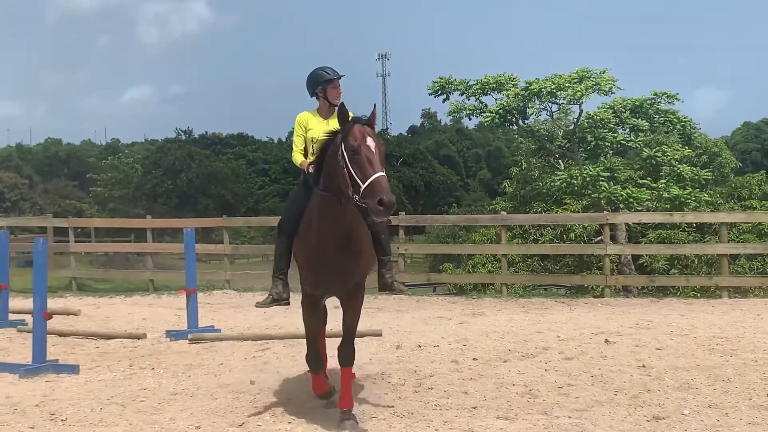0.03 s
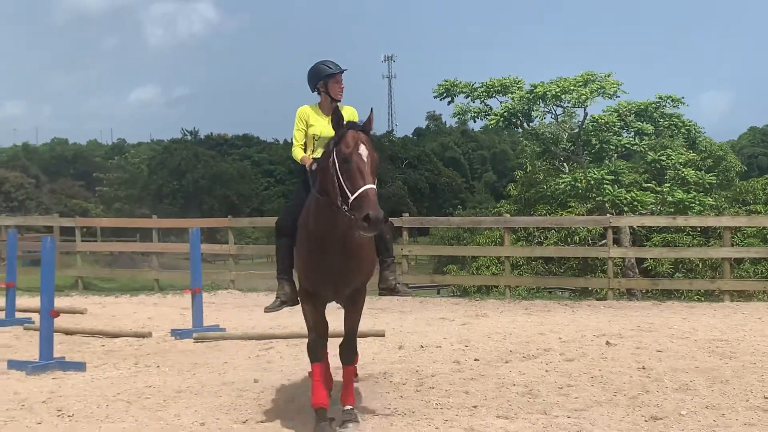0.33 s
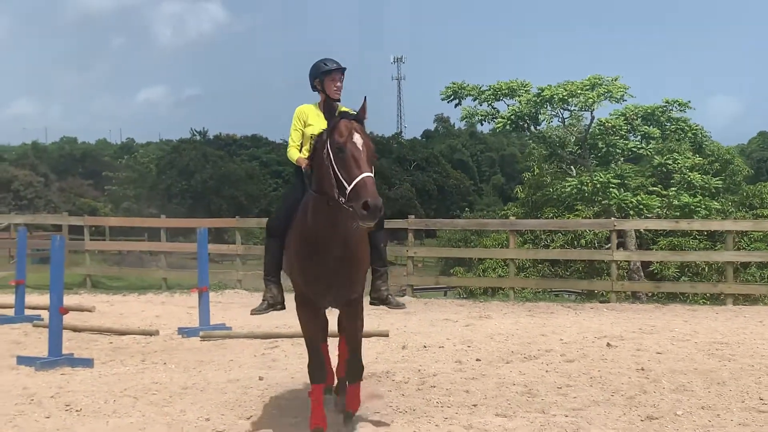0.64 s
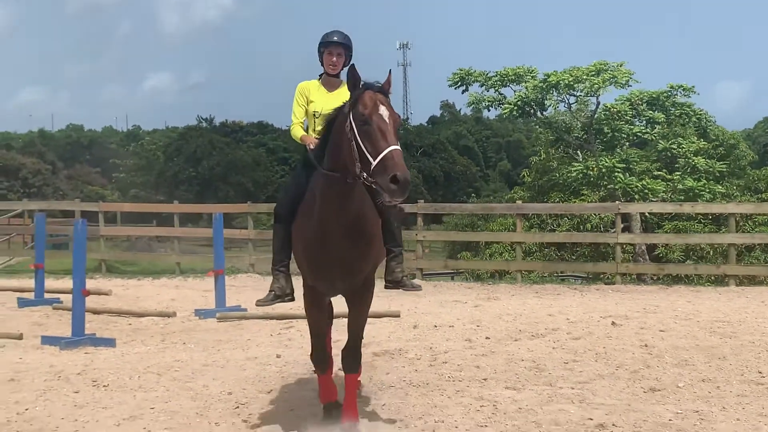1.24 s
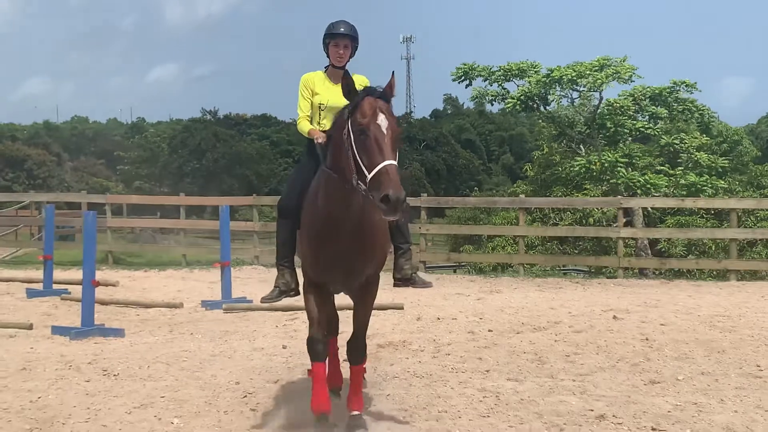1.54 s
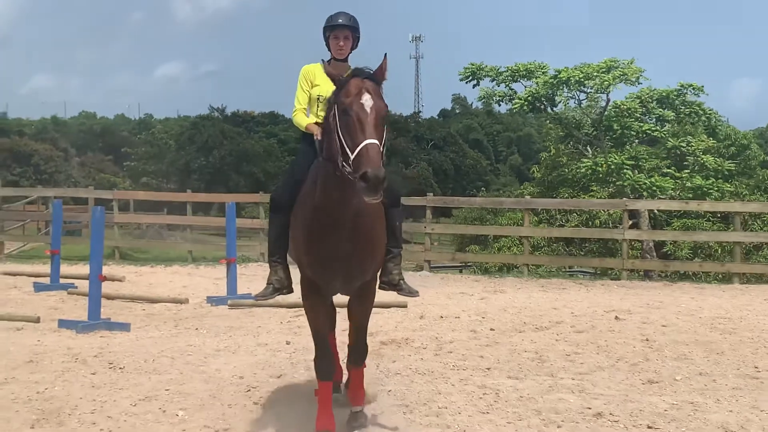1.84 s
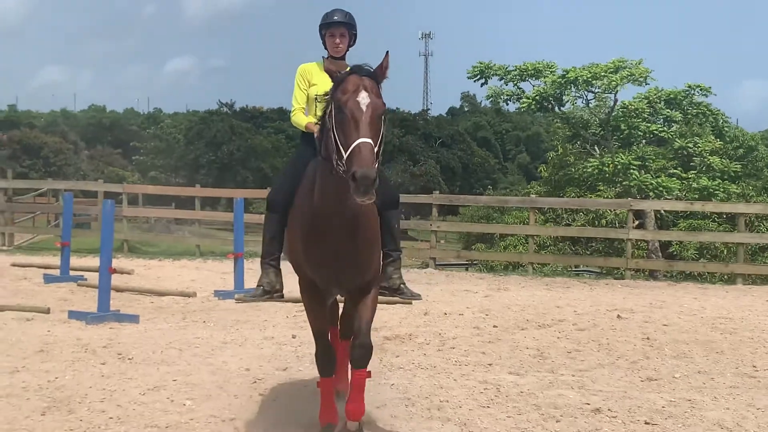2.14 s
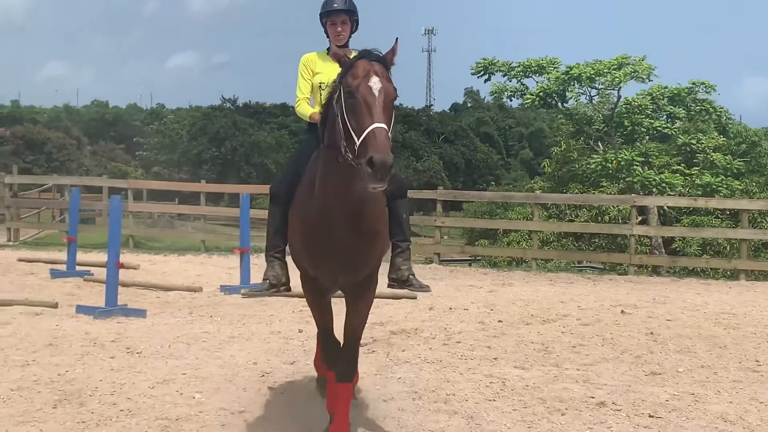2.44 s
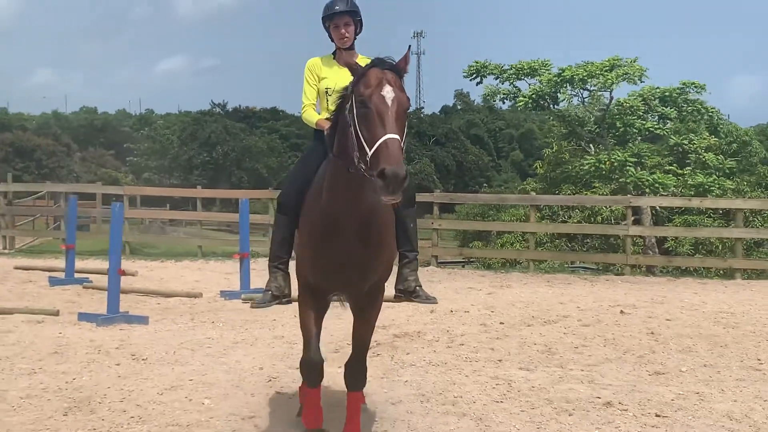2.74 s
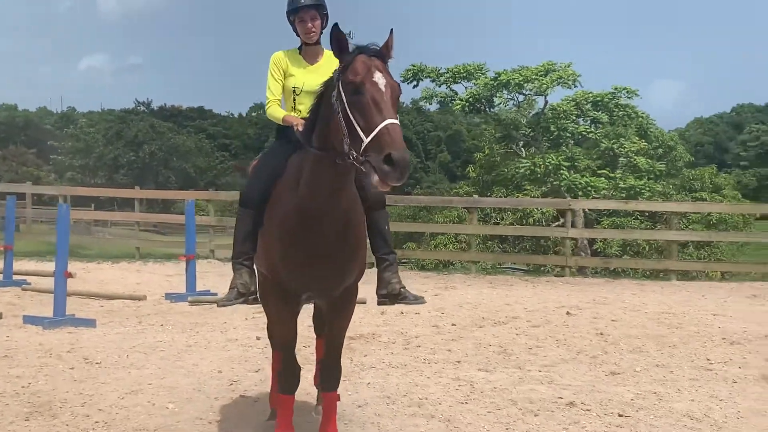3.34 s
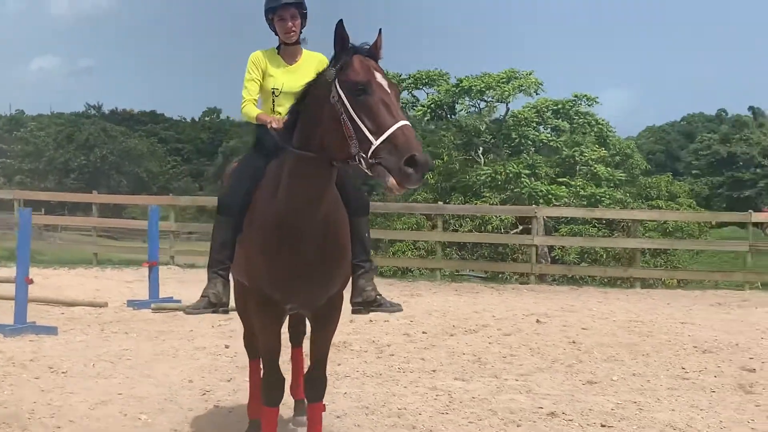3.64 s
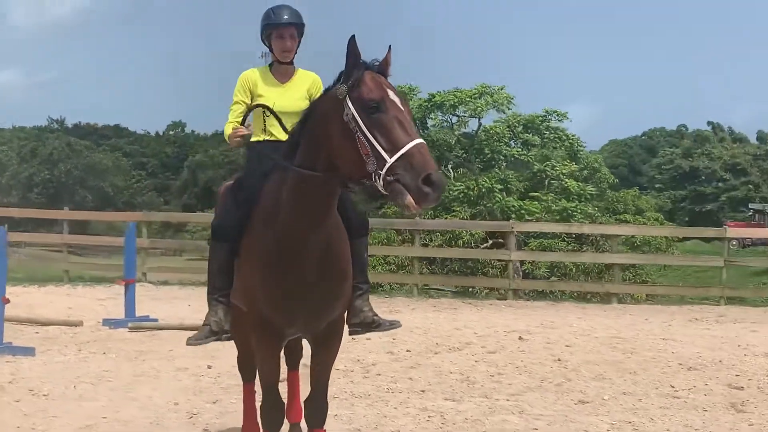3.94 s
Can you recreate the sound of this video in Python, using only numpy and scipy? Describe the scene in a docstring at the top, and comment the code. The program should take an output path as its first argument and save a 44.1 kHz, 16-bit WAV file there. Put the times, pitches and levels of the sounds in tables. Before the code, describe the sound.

A horse whinnies outdoors, trailing into short grunts over low wind rumble.

```python
"""Whinny across an outdoor arena

A horse whinnies: a high, hoarse whistle and a second, lower voice quaver together and sink, ringing
through throat and nose over rasping breath before the call breaks into grunts. Something wooden knocks
once, hooves scuff the sand and tack ticks. An engine idles far off, an insect sings and wind bumps
the microphone."""
import sys
import numpy as np
from scipy import signal
from scipy.fft import rfft, irfft, next_fast_len
from scipy.io import wavfile
from scipy.ndimage import map_coordinates

SR = 44100
rng = np.random.default_rng(int(sys.argv[2]) if len(sys.argv) > 2 else 0)


def waveform_to_disk(signal):
    """Save audio, clipped to [-1, 1], as 16-bit WAV at the path in sys.argv[1]."""
    frames = np.transpose(np.atleast_2d(signal))
    scaled = np.clip(frames, -1, 1) * 32767
    samples = np.round(scaled).astype(np.int16)
    wavfile.write(sys.argv[1], SR, samples)


N = 176400

# Tone of the open-air bed. Each row: frequency in Hz, gain in dB.
AIR_EQ = [(100, -9.5), (300, -2.5), (600, -7.5), (950, -3), (1400, -9.5), (2500, -21), (3700, -19),
          (6300, -18), (7600, -31), (10500, -34), (13000, -46)]
# Width of that bed. Each row: frequency in Hz, left-right correlation (1 is mono).
AIR_CORRELATION = [(300, 1), (500, 0.96), (950, 0)]
# The idling hum. Each row: multiple of the firing rate, level in dB before the swells.
ENGINE_ORDERS = [(2, -43.5), (2.5, -48.5), (3, -40.5), (4, -56.5), (5.35, -59)]
# The gusts. Each row: time in seconds, level in dB.
WIND_LEVEL = [(0, -40), (.35, -42.5), (.5, -49.5), (.85, -48.5), (1.05, -40.5), (1.95, -39.5), (2.1, -44),
              (2.5, -51.5), (2.7, -41), (4, -45)]
# Tone of the wind rumble. Each row: frequency in Hz, gain in dB.
WIND_EQ = [(15, -37), (32, -3.5), (65, 4), (110, -2.5), (170, -10), (250, -16), (400, -24.5), (900, -75.5)]
# Wind hitting the microphone. Each row: centre in seconds, peak in dB, frequency in Hz.
WIND_BUMPS = [(0.049, -29, 143), (0.152, -24, 74), (0.286, -25, 128), (1.023, -26.5, 138.2),
              (1.196, -25.5, 70.5), (1.311, -21.5, 64), (1.85, -25, 188.6), (1.886, -19, 114.9),
              (1.893, -32.5, 270), (2.26, -32, 135)]
# Hooves in sand. Each row: centre in seconds, half width in seconds, level in dB, frequency in Hz.
HOOF_SCUFFS = [(3.476, 0.032, -59, 3730), (3.679, 0.021, -62.5, 3500)]
# Tone of the knock's click. Each row: frequency in Hz, gain in dB.
CLICK_EQ = [(900, 0), (1750, 0), (2500, -26), (4200, -14), (5200, -26), (6600, -14), (8800, -24),
            (10500, -55)]
# The ringing wood. Each row: frequency in Hz, gain in dB, seconds to fall 60 dB.
WOOD_MODES = [(373, -31.5, 0.059), (507, -13, 0.022), (820, -27.5, 0.028)]
# The arena's tail. Each row: frequency in Hz, seconds to fall 60 dB.
ARENA_DECAY = [(1500, 0.46), (8000, 0.31)]
# Stereo phase of the direct call. Each row: frequency in Hz, lead of the left side in radians.
CALL_PHASE_LEAD = [(600, -5), (900, 2.5), (1100, -3.5), (1450, -3.5), (1700, -2.5), (2000, -1),
                   (3000, -1.5), (3400, 5), (4300, 0.5), (5800, -1.5), (6600, 1.6)]
# Stereo balance of the call. Each row: frequency in Hz, left over right in dB.
CALL_BALANCE = [(600, -0.5), (900, -3), (1300, 3), (1750, -0.5), (2200, -2.5), (2900, -4.5), (3300, 4),
                (3700, -8), (4300, 2.5), (6600, -2), (8200, -3)]
# The closing grunts. Each row: centre in seconds, level in dB before EQ, lowest pitch in Hz.
GRUNT_NOTES = [(2.629, -49, 507), (2.738, -51, 480), (2.868, -45.5, 434), (2.968, -52.5, 449),
               (3.055, -50, 303)]
# Tone of the grunts. Each row: frequency in Hz, gain in dB.
GRUNT_EQ = [(300, -16), (600, -3), (740, -8), (1000, 1), (1200, -9), (1650, -7.5), (2600, -26)]
# Resonances of throat and nose. Each row: frequency in Hz, gain in dB.
THROAT_EQ = [(250, -61.5), (600, -14), (770, -25), (900, -4), (1080, -8), (1220, -9), (1420, -0.5),
             (1520, -10.5), (1620, 2.5), (1800, -8), (2000, -15.5), (2290, -16.5), (2600, -27.5),
             (2900, -14), (3350, -13.5), (3900, -20.5), (4320, -17), (4700, -29), (5900, -43), (6700, -18),
             (7600, -41.5), (9000, -43), (13000, -54.5)]
# Extra colour of the tight mouth. Each row: frequency in Hz, gain in dB.
TIGHT_MOUTH_EQ = [(700, -9), (950, 2), (1120, -6), (1400, -1.5), (1700, -0.5), (2000, 1.5), (2600, -1.5)]
# The breath's rasp. Each row: time in seconds, then mid, upper-mid and treble gains in dB.
RASP_GAINS = [(0, -70, -77, -57), (.19, -62.5, -61, -66), (.23, -60, -55.5, -60), (.57, -58.5, -45.5, -56),
              (.72, -64, -44, -51.5), (.83, -56, -40, -57.5), (.97, -48, -50, -45.5),
              (1.3, -52.5, -47, -47.5), (1.98, -47.5, -45.5, -44.5), (2.03, -62, -42, -54.5),
              (2.28, -51.5, -48.5, -50), (2.36, -54, -41, -49), (2.54, -54.5, -39, -65),
              (2.62, -49.5, -50, -49), (2.95, -52, -43, -48.5), (3.0, -56.5, -53, -55),
              (3.2, -60.5, -69, -68)]
# The lower voice. Each row: time in seconds, crest pitch in Hz, level in dB before the throat.
LOW_VOICE_PATH = [(0, 996, -52), (.1, 997.5, -50.5), (.2, 940, -55), (.45, 940, -52), (.8, 955, -49),
                  (.87, 940, -53.5), (1.03, 940.5, -41.5), (1.35, 915, -48), (1.8, 888, -46.5),
                  (2.3, 871.3, -50.5), (3.0, 803.4, -63)]
# The whistle. Each row: time in seconds, crest pitch in Hz, drop into each dip in Hz,
# level in dB before the throat, roughness from 0 to 1.
WHISTLE_PATH = [(.1, 1980, 80, -67, 0.09), (.15, 1910, 119, -39.5, .05), (.2, 1870, 216.6, -56.5, 0.5),
                (.27, 1835, 219.4, -47, 0.45), (.7, 1878, 258, -36, 0.64), (.88, 1800, 202, -44, 0.57),
                (1.04, 1740, 157.2, -42, 0.45), (1.25, 1600, 189.8, -46, 0.6),
                (1.55, 1477, 165.2, -43.5, 0.21), (1.9, 1466, 146.3, -41, 0.06),
                (2.1, 1459, 110, -46.5, 0.34), (2.52, 1450, 120.9, -46.5, 0.33),
                (2.68, 1468, 257.8, -35.5, 0.01), (2.81, 1482, 370, -37.5, 0.03),
                (2.96, 1379, 345.4, -41, 0.09), (3.01, 1278, 297.4, -75, 0.2)]
# Hoarse tones around the whistle. Each row: offset in multiples of the flutter rate, gain in dB.
WHISTLE_SIDEBANDS = [(-1.5, -13), (1, 0.5), (2.5, -1), (3.5, -8)]

FLUTTER_HZ, TOP_HZ = 162, 15700
FULL_CRY_S = [.53, .54]  # here the rasp starts to pulse and the whistle's overtones step up


def amp(db):
    """Decibels to gain."""
    return 10 ** (np.asarray(db) / 20)


def unit(x):
    """Scale to rms 1."""
    return x / np.sqrt(np.mean(x ** 2) + 1e-20)


def clock():
    """Each sample's time in seconds."""
    return np.arange(N) / SR


def along(points, hz):
    """Read (Hz, value) points on a log frequency axis."""
    freqs, values = np.transpose(points)
    return np.interp(np.log(hz + 1), np.log(freqs + 1), values)


def curves(rows):
    """One automation curve for each column after the time."""
    times, *columns = np.transpose(rows)
    return [np.interp(clock(), times, column) for column in columns]


def wobble(rate):
    """A smooth random curve, rate knots a second."""
    return map_coordinates(rng.standard_normal(int(N * rate / SR) + 4), [clock() * rate])


def cycle(hz):
    """Running phase of a moving frequency."""
    return 2 * np.pi * np.cumsum(hz) / SR


def swell(centre_s, half_s):
    """A bell-shaped envelope."""
    return np.exp(-.5 * ((clock() - centre_s) / half_s) ** 2)


def filtered(x, response):
    """Apply a frequency response."""
    size = next_fast_len(N + SR // 2)
    return irfft(rfft(x, size) * response(np.fft.rfftfreq(size, 1 / SR)), size)[..., :N]


def eq(x, points):
    """Apply a (Hz, dB) curve."""
    return filtered(x, lambda hz: amp(along(points, hz)))


def band(hz, q):
    """Stereo noise of rms 1 in one resonance."""
    noise = rng.standard_normal((2, N))
    return unit(filtered(noise, lambda f: f / (f + 1j * q * (f * f - hz ** 2) / hz)))


def open_air(level_db=-60):
    """A soft, drifting bed of noise, centred in the bass and wide above."""
    def mid_side(hz):
        width = np.arccos(np.clip(along(AIR_CORRELATION, hz), -1, 1)) / 2
        return amp(along(AIR_EQ, hz)) * [np.cos(width), np.sin(width)]
    mid, side = filtered(rng.standard_normal((2, N)), mid_side)
    return unit(np.array([mid + side, mid - side])) * amp(level_db + 2.4 * wobble(4.74))


def insect(hz=8250):
    """One insect sings a thin band of noise to the right, fading near the end."""
    level_db = np.interp(clock(), [0, 3.6, 3.75], [-81, -79.5, -110])
    song = unit(filtered(band(hz, q=38), lambda f: np.abs(f - hz) < 500))
    return song * amp(level_db + 1.3 * wobble(28)) * amp([[-7], [2]])


def engine(firing_hz=35, wind_follow=.44):
    """Low orders of a distant, unsteady idle; the hum swells and fades with the wind."""
    firing = cycle(firing_hz + .23 * wobble(5.62))
    wind_db, = curves(WIND_LEVEL)
    fade = amp(wind_follow * (wind_db - wind_db.mean()))
    hum = sum(amp(db + 2.06 * wobble(5.9)) * np.sin(k * firing + rng.uniform(0, 2 * np.pi))
              for k, db in ENGINE_ORDERS)
    return np.sqrt(2) * fade * hum


def wind():
    """Gusts rumble on the microphone, with short bumps of air."""
    level_db, = curves(WIND_LEVEL)
    rumble = unit(eq(rng.standard_normal(N), WIND_EQ)) * amp(level_db + 3.56 * wobble(13))
    bumps = sum(amp(db) * swell(s, .5 / hz) * np.cos(2 * np.pi * hz * (clock() - s))
                for s, db, hz in WIND_BUMPS)
    return rumble + bumps


def tack(times_s=(.81, 1.3, 2.1), level_db=-64.5):
    """Bit and buckles tick faintly as the head moves."""
    return band(hz=14000, q=3.6) * amp(level_db) * sum(swell(s, half_s=.0023) for s in times_s)


def hooves():
    """A walking horse leaves grainy scuffs in the sand."""
    scuffs = sum(amp(db) * swell(s, half_s) * unit(filtered(band(hz, q=8.3), lambda f: f < 2 * hz))
                 for s, half_s, db, hz in HOOF_SCUFFS)
    return scuffs * amp(2 * wobble(300))


def knock(start_s=3.3995, click_half_s=.00074, ring_lag_s=.00416, attack_s=.0019):
    """Struck wood: a dull click of contact, then a short hollow ring."""
    burst = rng.standard_normal((2, N)) * swell(start_s + click_half_s, click_half_s)
    age = np.maximum(clock() - (start_s + ring_lag_s), 0)
    ring = sum(np.sin(2 * np.pi * hz * age) * amp(db - 60 * np.minimum(age / t60, 3))
               for hz, db, t60 in WOOD_MODES)
    ring *= 1 - np.exp(-age / attack_s)
    return eq(burst, CLICK_EQ) * amp(-19) + ring * amp([[-1], [1]])


def arena_tail(x):
    """Fence and trees scatter a thin tail, different on each side."""
    hz, t, spectra = signal.stft(rng.standard_normal((2, SR // 2)), SR, nperseg=256)
    decay = amp(-60 * t / along(ARENA_DECAY, hz)[:, None])
    tail = signal.istft(spectra * decay, SR, nperseg=256)[1]
    predelayed = np.pad(x, (400, 0))[None]
    return signal.fftconvolve(predelayed, tail / np.linalg.norm(tail[0]), axes=1)[:, :N]


def grunts(half_s=.018, swoop_hz=158.3):
    """The voice breaks into short, rough notes, each swooping down and back up."""
    notes = np.zeros(N)
    for s, db, hz in GRUNT_NOTES:
        phase = cycle(hz + swoop_hz * (1 - swell(s, 1.5 * half_s)) + 22 * wobble(400))
        notes += amp(db) * swell(s, half_s) * sum(np.sin(k * phase) for k in range(1, 7))
    return eq(notes * amp(3 * wobble(260)), GRUNT_EQ)


def quaver(dip_at_s=.275, period_s=.113, slowing_s=.00022, arch=1.3):
    """The call's steadily slowing shake: 0 on each rounded crest, 1 in the dip."""
    period_now_s = np.sqrt(period_s ** 2 + 4 * slowing_s * (clock() - dip_at_s))
    beats = (period_now_s - period_s) / (2 * slowing_s)
    fade_in = np.interp(clock(), [.08, .14], [0, 1])
    return fade_in * (1 - np.abs(np.sin(np.pi * beats)) ** 1.5) ** arch


def mouth(x, opens_s=(.85, 1.35)):
    """The tight mouth's colour fades away as it opens."""
    tight = np.interp(clock(), opens_s, [1, 0])
    return tight * eq(x, TIGHT_MOUTH_EQ) + (1 - tight) * x


def rasp(dip, lead_s=.024):
    """Turbulent breath chopped by the flutter: lows swell on the crests, highs around the dips."""
    mid_db, upper_db, treble_db = curves(RASP_GAINS)
    noise = rng.standard_normal(N)
    chop = 1 + .5 * np.cos(cycle(FLUTTER_HZ + 40 * wobble(100)))
    breath = unit(eq(noise * chop, THROAT_EQ))
    between = lambda low_hz, high_hz: filtered(breath, lambda f: (f > low_hz) & (f <= high_hz))
    pulse = (dip - dip.mean()) * np.interp(clock(), FULL_CRY_S, [0, 1])
    early_pulse = np.roll(pulse, -round(lead_s * SR))
    mid = between(0, 1900) * amp(mid_db - 3 - 6 * pulse)
    upper = between(1900, 2540) * amp(upper_db + 6.9 * early_pulse)
    nasal = between(2730, 4206) * amp(upper_db - 3 + 7 * pulse)
    treble = between(4310, TOP_HZ) * amp(treble_db + 8 * early_pulse)
    return amp(wobble(40.15)) * (mid + upper + nasal + treble)


def low_voice(dip, drop_hz=55.1, duck_db=9.5, lag_s=.018):
    """Two equal harmonics that duck in each dip, their pitch sagging just behind."""
    crest_hz, level_db = curves(LOW_VOICE_PATH)
    late_dip = np.roll(dip, round(lag_s * SR))
    phase = cycle(crest_hz - drop_hz * late_dip + 6 * wobble(250))
    return (np.sin(phase) + np.sin(2 * phase)) * amp(level_db - duck_db * dip + 1.6 * wobble(60))


def whistle(dip, duck_db=4, sideband_duck_db=9, overtone_lift_db=11):
    """The high, jittery voice: hoarse sidebands peak on the crests, overtones brighten in the dips."""
    crest_hz, drop_hz, level_db, roughness = curves(WHISTLE_PATH)
    jitter_hz = 105 * (roughness + .12 * dip) * wobble(600)
    phase = cycle(crest_hz - drop_hz * dip + jitter_hz)
    flutter = cycle(FLUTTER_HZ + 25 * wobble(150))
    sidebands = sum(amp(db - sideband_duck_db * dip) * np.sin(phase + k * flutter + .55 * wobble(150))
                    for k, db in WHISTLE_SIDEBANDS)
    octave = np.sin(2 * phase + .9 * wobble(350)) * amp(6)
    third = np.sin(3 * phase + wobble(350)) * amp(-1.5)
    overtones = (octave + third) * amp(overtone_lift_db * (dip - 1))
    overtones *= np.interp(clock(), FULL_CRY_S, [.3, 1])
    hoarseness = np.sqrt(np.clip(4 * roughness, 0, 1))
    tone = np.sin(phase) + hoarseness * (sidebands + overtones)
    return tone * amp(level_db + duck_db * (dip.mean() - dip) + 2.66 * wobble(120))


def whinny(echo_s=.055, echo_db=-11.5, echo_cutoff_hz=2500, tail_db=-12.5):
    """Both voices ring through throat and mouth, heard direct, echoed once and scattered."""
    dip = quaver()
    release = np.interp(clock(), [3, 3.05], [1, 0])
    voices = eq((low_voice(dip) + whistle(dip)) * release, THROAT_EQ)
    call = mouth(voices + rasp(dip)) + grunts()
    sides = np.array([[.5], [-.5]])
    direct = filtered(call, lambda hz: np.exp(1j * sides * along(CALL_PHASE_LEAD, hz)))
    echo = filtered(call, lambda hz: np.exp(-2j * np.pi * hz * echo_s) / (1 + (hz / echo_cutoff_hz) ** 4))
    mix = direct + amp(echo_db) * echo + amp(tail_db) * arena_tail(call)
    return filtered(mix, lambda hz: amp(sides * along(CALL_BALANCE, hz)))


def scene():
    """The whinny out front, small sounds and outdoor bed behind it."""
    return whinny() + engine() + wind() + knock() + hooves() + tack() + insect() + open_air()


def record(dry):
    """A brick-wall high cut on the whole mix."""
    return filtered(dry, lambda hz: hz < TOP_HZ)


dry = scene()
out = record(dry)
waveform_to_disk(out)
```